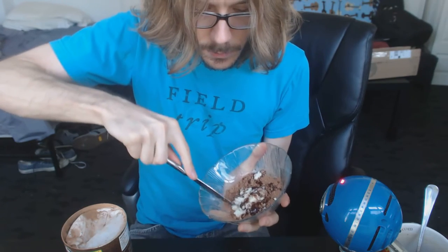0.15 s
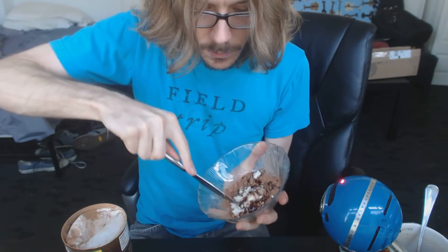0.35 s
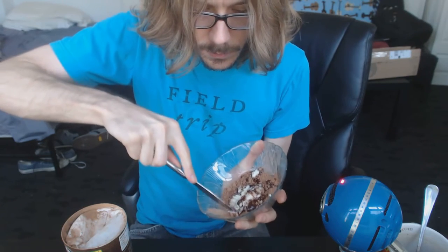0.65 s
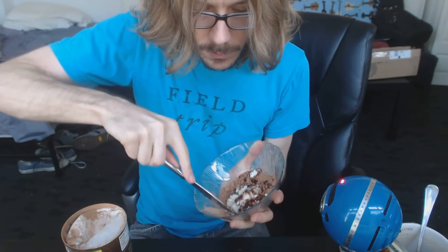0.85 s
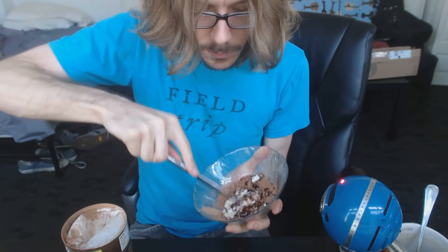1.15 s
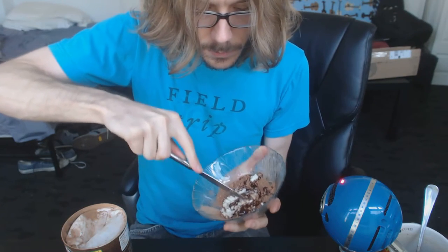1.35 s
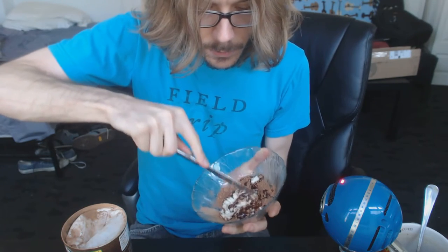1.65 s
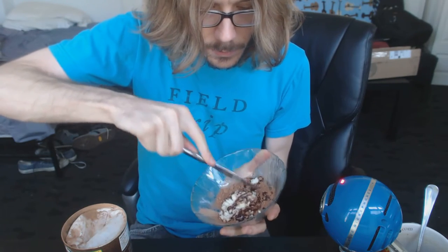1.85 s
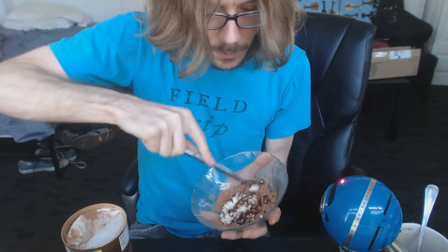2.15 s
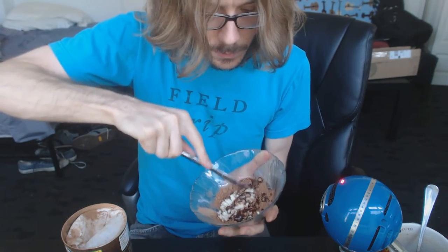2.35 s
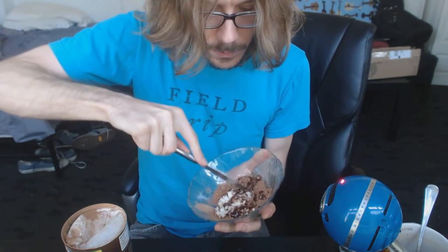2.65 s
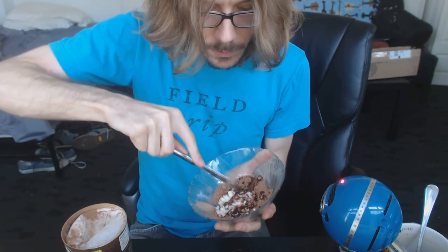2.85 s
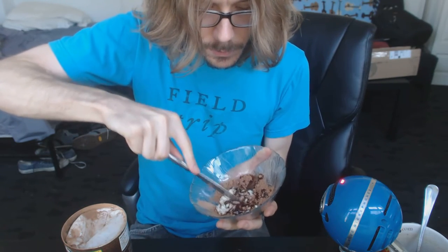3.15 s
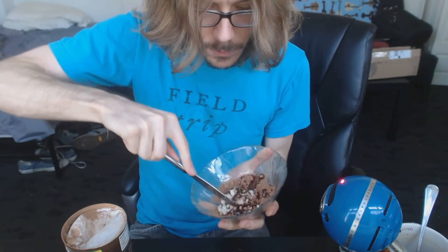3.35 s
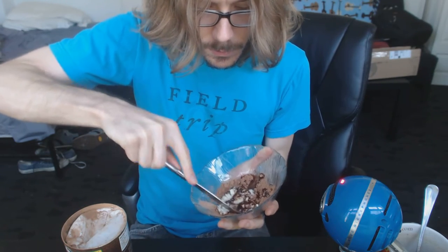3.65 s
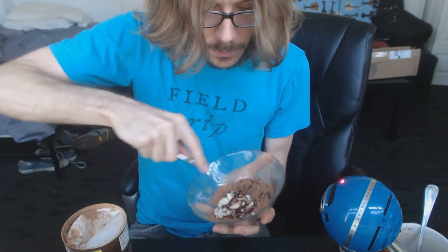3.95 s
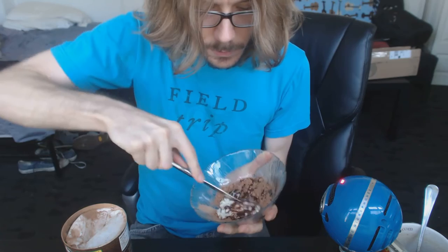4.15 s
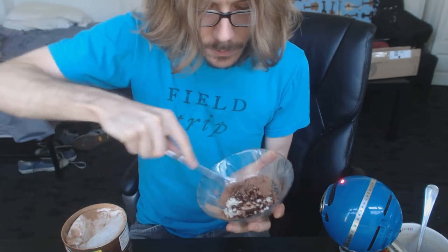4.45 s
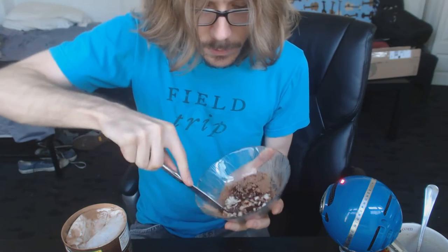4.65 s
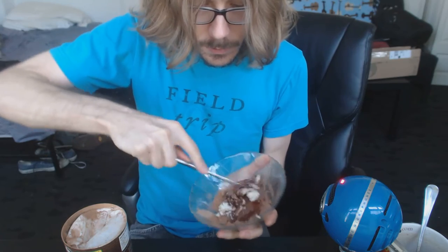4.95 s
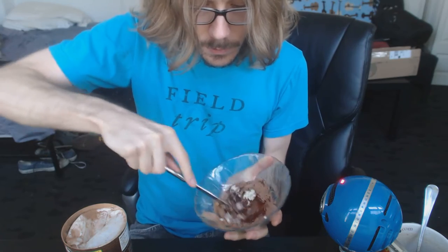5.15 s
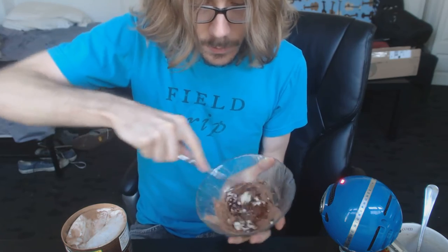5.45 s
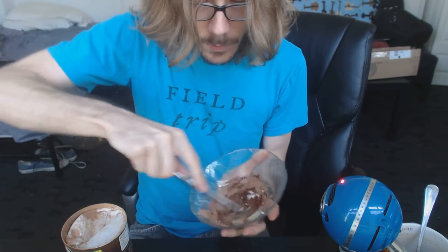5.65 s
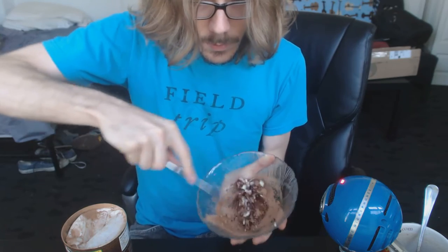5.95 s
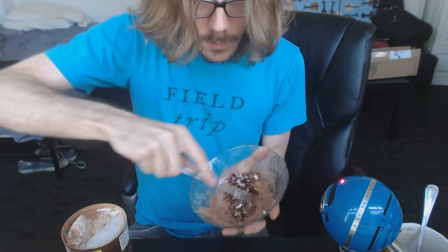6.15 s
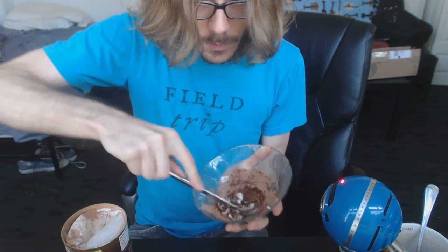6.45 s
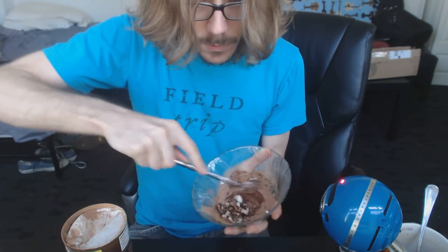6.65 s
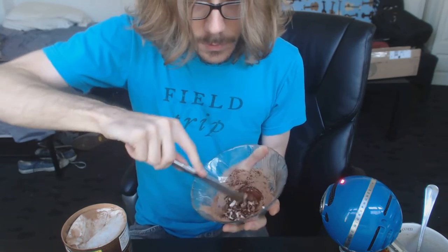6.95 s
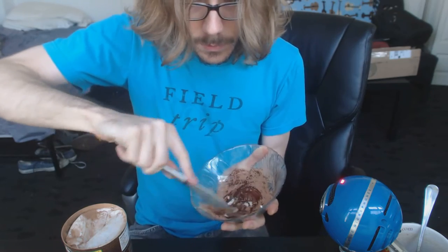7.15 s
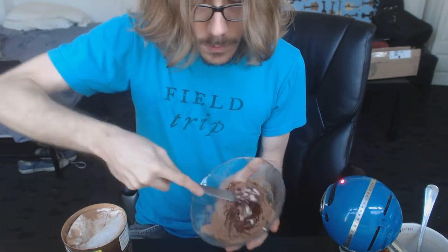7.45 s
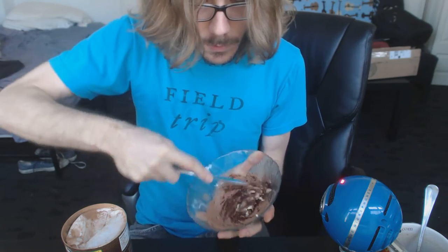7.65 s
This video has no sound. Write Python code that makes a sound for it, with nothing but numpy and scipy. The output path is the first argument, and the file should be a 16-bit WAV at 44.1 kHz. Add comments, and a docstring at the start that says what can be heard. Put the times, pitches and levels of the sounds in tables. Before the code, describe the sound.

Sharp glass-and-metal clacks, loud and dry, open the scene in quick succession, some bright, some dull and thuddy. Midway there is a short gap, then more chopping mixed with tiny clinks and scratchy rubs along the glass. The last seconds are sparser and softer. Close microphone, short room tail, faint hiss, low fan noise sinking slowly throughout.

```python
"""Chopping and stirring in a glass bowl

A steel utensil works a stiff mixture in a hand-held glass bowl, close to a desk microphone.
Knocks excite the damped bowl's resonances and the free rim; ticks and scrapes excite its wall.
Each chop sways the desk as a slow decaying swing; decaying noise tails give a small furnished room.
Behind it lie a fan's shaped-noise rush, its narrow-band hums and a faint microphone hiss."""
import sys
import numpy as np
from scipy import signal
from scipy.fft import rfft, irfft, next_fast_len
from scipy.io import wavfile
from scipy.ndimage import map_coordinates

SR = 44100
rng = np.random.default_rng(int(sys.argv[2]) if len(sys.argv) > 2 else 0)


def int16_out(signal):
    """Quantize to a 16-bit WAV file."""
    q = np.round(np.clip(np.atleast_2d(signal).T, -1, 1) * 32767)
    wavfile.write(sys.argv[1], SR, q.astype(np.int16))


N = 343980


# Shifts of the blade's top band over time: (t/s, gain/dB)
BLADE_TOP_GAIN = [(0, -1), (5.2, 0.5), (5.35, 1.5), (6.1, 4), (6.2, -1), (7.8, 5)]


def blade():
    """Sums knocks, ticks and scrape; the band above about 11.8 kHz rises and dips over time."""
    air = knocks() + ticks() + scrape()
    top = filtered(air, lambda hz: 1 / (1 + (11800 / (hz + 1)) ** 12))
    top_gain = amp(np.interp(np.arange(N) / SR, *np.transpose(BLADE_TOP_GAIN)))
    return air + (top_gain - 1) * top


# Blows of the blade, levels relative: (t/s, level/dB, thud f/Hz, thud level/dB, clack level/dB,
#  brightness level/dB, bounce length/ms, blade ping f/Hz, ping level/dB, rim ring level/dB,
#  rim f woken most/Hz, desk sway level/dB)
BLOWS = [(-0.1, -2, 1100, -9.5, -16, -2, 5, 4886, -14, -33, 2000, -44.5),
         (0.073, 1.5, 1112, -12.5, -15, 1, 4.8, 4810, -12, -32, 2213, -42),
         (0.248, 0.5, 1100, -12, -17, 0, 5, 4800, -15, -32.5, 2000, -41),
         (0.398, 4, 1020, -14.5, -17, 1, 7.3, 4900, -12, -33.5, 2000, -39),
         (0.596, -8.5, 1062, -5.5, -21, 3.5, 5.021, 3140, -18, -21, 890, -43),
         (0.798, -30, 703, 4, -29, -3.5, 4.8, 3190, -13.5, -16, 650, -54),
         (0.932, -22.5, 565, 5.5, -14, -6, 3.6, 3270, -10, -13.5, 1250, -65),
         (1.214, -2, 902, -15, -17.5, -5.5, 2.03, 3090, -24, -28.5, 3200, -46),
         (1.405, -15.5, 1030, -5.5, -14, -3, 2.4, 2930, -31, -27, 2700, -50),
         (1.552, -13.5, 1040, -9.5, -14.5, -3, 3.1, 2870, -28, -27, 2700, -44.5),
         (1.695, -8.5, 1021, -6, -13.5, -9.5, 2.3, 2980, -19.5, -33, 2710, -40),
         (1.849, -12, 1030, -7.5, -17, -0.5, 2.887, 2857, -13, -32, 2400, -39.5),
         (2.017, 5, 978, -16, -17, 3.5, 6.8, 10500, -18.5, -35, 3496, -42),
         (2.213, -14.5, 1135, -9, -17, 0, 7.2, 4840, -8.5, -10.5, 1950, -47),
         (2.306, -29, 1050, -13, -21.5, 4.5, 4, 4788, -8, -18, 1800, -69),
         (2.473, -2.5, 1024, -12, -13, 5, 5, 9600, -22, -34, 2200, -54),
         (3.013, -22.5, 1028, -4, -8, -15, 1.894, 2930, -18, -38.5, 1500, -47.5),
         (3.219, -1, 1040, -11.5, -10, 2.5, 6.43, 3360, -18.5, -28, 3200, -44.5),
         (3.413, -6, 1080, -9.5, -11, 2.5, 5.7, 3370, -21, -23.5, 2700, -45),
         (3.579, -11.5, 1040, -3.5, -9.5, 3.5, 4, 2930, -32, -28.5, 2500, -57),
         (3.786, -10.5, 1080, -7, -17, 5, 5.356, 9880, -13, -28.5, 1001, -53.5),
         (3.881, -18, 1114, -0.5, -13.5, 6.5, 3.8, 3240, -4, -24, 2320, -42),
         (4.053, -14, 1040, -6, -14.5, 8.5, 7.136, 5500, -11, -18.5, 1370, -70),
         (4.275, -23, 1030, 2, -7.5, 3, 3.4, 2940, -24, -36, 2200, -43),
         (4.681, -7, 1027, -7, -18.5, 1.5, 4.2, 3528, -8.5, -38, 1300, -43),
         (4.969, -23.5, 1066, -8, -20, 2.5, 6.5, 9466, -21, -24, 1496, -46),
         (5.173, 0.5, 1260, -24.5, -26.5, -10.5, 2.74, 7537, -18, -21.5, 4300, -55),
         (5.449, -11.5, 1000, -15, -20, 1.5, 5.1, 4390, -20.5, -20.5, 3000, -60),
         (5.8, -26, 1080, -5, -15, 0.5, 8, 6720, -10.5, -11, 1797, -63),
         (5.869, -24.5, 886, -1, -24, -18, 7.2, 2500, -2, -5, 1600, -66.5),
         (5.88, -17.5, 877, -2.5, -18, -8, 4.2, 2697, -25, -2, 2100, -75),
         (6.116, -29, 950, -2, -21.5, -5, 8.4, 3330, -18, -33, 3500, -51),
         (6.331, -9, 1000, -8.5, -18, 6, 10.9, 9740, -4.5, -24.5, 1000, -52.5),
         (6.527, -25, 958, -12.5, -20, 7, 3.776, 3800, -4, -30, 2790, -46.5),
         (6.624, -32.5, 1190, 0, -17.5, -4.5, 9.7, 3280, -16, -11.5, 1510, -51),
         (7.386, -29, 1184, 0, -19.5, 1, 2.905, 3260, -8, -13, 1380, -74.5),
         (7.458, -21.5, 1080, -3.5, -13, 5, 2.579, 9710, -19, -23, 2800, -53.5),
         (7.497, -20.5, 1195, -25, -19.5, 1, 4.5, 4310, -10, -23.5, 4400, -69)]
# Share sent into the room: more for long bounces, deep thuds and weak blows
THROWN_DB, THROWN_DB_PER_MS, THROWN_WITH_THUD, THROWN_SHRINKS = -16.5, 0.38, 0.13, 0.037


def knocks():
    """Each knock is a struck bowl plus a rim ring, both thrown into the room."""
    air, t = np.zeros(N), np.arange(SR // 4) / SR
    for s, db, thud_hz, thud_db, clack_db, bright_db, ms, ping_hz, ping_db, rim_db, rim_hz, _ in BLOWS:
        tilt = knock_colour(thud_db, clack_db, bright_db)
        ping = resonances([(thud_hz, 110, thud_db - 3), (ping_hz, 100, ping_db)])
        body, around = struck_bowl(t, db, ms, tilt, ping)
        ring = amp(db + rim_db) * rim_ring(t, rim_hz)
        thrown_db = THROWN_DB + THROWN_DB_PER_MS * min(ms, 8)
        thrown_db += THROWN_WITH_THUD * thud_db - THROWN_SHRINKS * db
        gain = amp(db - 0.9) / np.abs(body).max()
        knock = room(gain * body + ring, wet_db=thrown_db, spread=gain * around + ring)
        add(air, s + 0.00051, knock)
    return air


# Tone colour of a knock: (f/Hz, level/dB, share of thud dB, share of clack dB, share of brightness dB)
KNOCK_COLOUR = [(600, -19.5, 1.0, 0, 0), (1100, 0, 1.0, 0, 0), (2000, -14, 0.77, 0.16, 0),
                (3200, -1.5, 0, 1.0, 0), (5720, -24, 0, 0.0449, 0.94), (10000, -19.5, 0, 0, 1.5),
                (14000, -26.5, 0, 0, 1.0327)]


def knock_colour(thud_db, clack_db, bright_db):
    """Where the blade lands sets the balance of thud, clack and brightness, as (f/Hz, level/dB)."""
    return [(hz, level + low * thud_db + mid * clack_db + high * bright_db)
            for hz, level, low, mid, high in KNOCK_COLOUR]


# Modes of the held bowl with its mixture, before a small random shift: (f/Hz, width/Hz, level/dB)
BOWL_MODES = [(527, 170, 7.5), (720, 110, -3.5), (1020, 140, 0), (1171, 490, -3.5), (1839.5, 130, -0.5),
              (2058, 230, -1.5), (2962, 230, 1), (3417.7, 270, 1.5), (3880, 310, -6), (4330, 140, -2.5),
              (4810, 400, 4.5), (5465, 730, 0), (6530, 140, 0.5), (6974, 130, -3.5), (7005, 500, -2.5),
              (8340, 75, -7), (9603, 450, 2), (10950, 84, -3.5), (11600, 120, -5), (11822, 200, -4.5),
              (15600, 94, -1), (14200, 250, -2.5), (15300, 200, -5.5)]


def struck_bowl(t, db, ms, tilt, ping):
    """A sharp blow and weaker bounces drive bowl modes, crack and ping: near sound, sound all around."""
    blow = 0.66 * (t == 0)
    bounce_shape = np.exp(-(1000 * t / np.clip(ms, 1, 20)) ** 3)
    bounces = 0.082 * rng.standard_normal(len(t)) * bounce_shape
    modes = [(hz * rng.normal(1, .008), w, level + along(tilt, hz) + rng.normal(0, 2))
             for hz, w, level in BOWL_MODES]

    def contact(f):
        """A weak blow stays longer in contact, which dulls it."""
        return 1 / (1 + 2j * np.pi * f * 1.2e-5 * amp(-.3 * db)) ** 2

    def crack(f):
        """A dry crack in broad, steep-sided bands fills the gaps between modes."""
        return sum(amp(level - 14.0) * resonances([(hz, .8 * hz, 0)])(f) ** 2 for hz, level in tilt)

    def near(f):
        """The bowl as heard directly."""
        return resonances(modes)(f) + crack(f) + ping(f)

    def everywhere(f):
        """What leaves in all directions: narrower modes and less crack."""
        narrow = resonances([(hz, .85 * w, level) for hz, w, level in modes])
        return narrow(f) + amp(-2) * crack(f) + ping(f)

    body = filtered(blow + bounces, lambda f: contact(f) * near(f))
    around = filtered(filtered(blow, everywhere), contact)
    around *= np.linalg.norm(body) / np.linalg.norm(around)
    return body, around


# Partials of the free rim: (f/Hz, level/dB, t60/s)
RIM_PARTIALS = [(699, 4, 0.21), (1574, -3.5, 0.21), (2730, -1, 0.095), (4073, -5, 0.14), (5500, -22.5, .12)]


def rim_ring(t, rim_hz):
    """Decaying sine partials of the rim, 16 dB weaker per octave away from the pitch woken most."""
    ring = np.zeros(len(t))
    for hz, level, t60 in RIM_PARTIALS:
        away_db = 16 * abs(np.log2(hz / rim_hz))
        ring += amp(level - away_db - 60 * t / t60) * np.sin(2 * np.pi * hz * t)
    return ring * (1 - np.exp(-t / 0.0014))  # soft onset


# Small touches of the blade on glass and hard crumbs, levels relative: (t/s, level/dB, f/Hz)
TOUCHES = [(2.748, -56.5, 3250), (3.0594, -52, 3000), (3.6194, -41.5, 3010), (4.0898, -34, 3239),
           (4.2337, -52.5, 5440), (4.2914, -44, 3000), (4.301, -38.5, 5020), (4.33, -46.5, 4900),
           (4.3797, -36, 9730), (4.8592, -49, 9850), (4.878, -43, 4952), (4.948, -54, 12000),
           (5.017, -53, 9500), (5.0414, -53, 3480), (5.0629, -45, 5800), (5.0945, -40.5, 12650),
           (5.1372, -55, 3050), (5.268, -35, 3430), (5.2995, -37.5, 3730), (5.328, -31.5, 3850),
           (5.352, -39.5, 3380), (5.3706, -41, 10000), (5.421, -40, 4970), (5.6258, -31, 6940),
           (5.6376, -40.5, 6790), (5.8122, -36, 6660), (5.921, -40.5, 3770), (6.0463, -48, 5660),
           (6.065, -38, 4480), (6.1474, -47, 3206), (6.1714, -51.5, 3250), (6.4517, -44, 6902),
           (6.4845, -36.5, 11900), (6.5055, -37.5, 3900), (6.7994, -59, 4135), (6.8204, -47.5, 11600),
           (6.8299, -38, 4230), (7.5187, -42, 3914), (7.7494, -66, 4277)]
# Modes of the glass wall, for ticks and scrape: (f/Hz, width/Hz, level/dB)
WALL_MODES = [(3220, 320, -4.5), (3770, 150, 0), (4900, 320, -6.5), (5610, 260, -3), (6740, 264.8, 1),
              (8680, 270, -3), (9724, 250, -2.5), (10620, 320, -5.5), (11900, 200, -3), (12700, 180, -12),
              (14027, 140, -4), (15200, 230, -11)]


def ticks():
    """A touch of a few ms: a blip at its own pitch that also wakes the wall, unevenly."""
    air, t = np.zeros(N), np.arange(SR // 20) / SR
    wall_tilt = [(5000, -5), (9000, -8.5)]  # how much of the wall a tick wakes: (f/Hz, level/dB)
    for s, db, hz in TOUCHES:
        touch = rng.standard_normal(len(t)) * np.exp(-t / 0.0025)
        wall = [(c, w, level + along(wall_tilt, c) + rng.normal(0, 1.8)) for c, w, level in WALL_MODES]
        blip = filtered(touch, resonances([(hz, 450, 0)]))
        tick = filtered(touch, resonances(wall)) + amp(3) * blip
        tick *= amp(db + 1.5) / np.abs(tick).max()
        add(air, s - .0005, room(tick, wet_db=-11.5))
    return air


def scrape():
    """Tiny uneven catches on a smooth rub drive wall modes that come and go as the blade travels."""
    caught = rng.random(N) < 320 / SR  # about 320 catches a second
    catches = caught * rng.standard_normal(N) * amp(7 * rng.exponential(size=N))
    rub = unit(catches) * 2.3 + rng.standard_normal(N)
    wall = np.zeros(N)
    for k, mode in enumerate(WALL_MODES):
        wall += (-1) ** k * amp(1.8 * wobble(14)) * filtered(rub, resonances([mode]))
    level = pressure() * amp(5.1 * wobble(110))  # fast flutter gathers the catches in clumps
    return room(amp(2.5) * level * unit(wall), wet_db=-12)[:N]


# Strokes of the blade along the wall, levels relative: (start t/s, length/s, level/dB)
WALL_STROKES = [(3.882, .03, -56.5), (4.081, 0.018, -41), (4.281, .13, -59), (4.434, 0.034, -65.5),
                (4.855, .03, -65), (4.98, 0.15, -59.5), (5.253, 0.1653, -61), (5.423, 0.025, -47),
                (5.49, .1, -65), (5.613, 0.033, -51), (5.81, 0.053, -60), (5.89, 0.13, -68),
                (6.039, 0.042, -57.5), (6.12, .06, -69), (6.42, 0.14, -55.5), (6.81, .04, -65),
                (7.363, .09, -68), (7.465, 0.078, -56)]
BITE_DB_PER_S, LIFT_DB_PER_S = 1500.5, 902  # how fast a stroke sets in and lets go


def pressure():
    """The blade's rub on the wall: each stroke sets in, holds and lets go."""
    t = np.arange(N) / SR
    total = np.zeros(N)
    for s, length, db in WALL_STROKES:
        bite = BITE_DB_PER_S * (t - s)
        lift = LIFT_DB_PER_S * (s + length - t)
        total += amp(db + np.minimum(0, np.minimum(bite, lift)))
    return total


def sway():
    """Chops rock the desk through arm and chair: decaying 13 Hz swings over a faint steady rumble."""
    desk, t = np.zeros(N), np.arange(SR // 2) / SR
    swing = -np.sin(2 * np.pi * 13 * t) * amp(-60 * t / .5) * (1 - np.exp(-t / 0.037))
    for s, *_, sway_db in BLOWS:
        add(desk, s - .02, amp(sway_db + 14.5) * swing)
    rumble = unit(filtered(rng.standard_normal(N), resonances([(8.8, 6, 0)])))
    return desk + amp(-52.5 + wobble(3.7)) * rumble


# Spectrum of the fan's rush, relative: (f/Hz, level/dB per Hz)
FAN_RUSH = [(20, -0.5), (60, 3), (100, -6.5), (200, -5), (400, -12), (800, -16), (1150, -13), (1600, -21.5),
            (2500, -37), (3300, -36), (5000, -41), (7000, -50), (10000, -62)]
# Narrow hums of the fan: (f/Hz, width/Hz, rms level/dB)
FAN_HUM = [(42, 6.9, -64), (122.6, 7.6, -60.5), (172, 9.9, -65)]
FAN_START_DB, FAN_FADES_DB_PER_S = -49, 0.89


def fan():
    """Shaped noise as a slightly unsteady rush that slowly sinks, with steady narrow-band hums."""
    rush = filtered(rng.standard_normal(N), lambda hz: amp(along(FAN_RUSH, hz)))
    rush_db = FAN_START_DB - FAN_FADES_DB_PER_S * np.arange(N) / SR + 0.67 * wobble(5.2)
    air = amp(rush_db) * unit(rush)
    for hz, width, db in FAN_HUM:
        air += amp(db) * unit(filtered(rng.standard_normal(N), resonances([(hz, width, 0)])))
    return air


# Spectrum of the microphone's own noise, relative: (f/Hz, level/dB per Hz)
MIC_HISS = [(1500, -4.5), (5000, -0.5), (9000, -3.5), (16000, -7)]


def hiss():
    """The microphone's steady, faint noise."""
    return amp(-81) * unit(filtered(rng.standard_normal(N), lambda hz: amp(along(MIC_HISS, hz))))


# Decay of the small furnished room: (f/Hz, t60/s)
ROOM_DECAY = [(300, .45), (1000, 0.35), (3000, 0.38), (6000, 0.34), (10000, 0.28), (16000, 0.18)]


def room(sound, wet_db, spread=None):
    """Adds a noise tail dying band by band; spread, if given, is what leaves in all directions."""
    hz, t, z = signal.stft(rng.standard_normal(SR // 2), SR, nperseg=256)
    decay = amp(-60 * t / along(ROOM_DECAY, hz)[:, None])
    tail = signal.istft(z * decay, SR, nperseg=256)[1]
    tail *= np.clip(np.arange(len(tail)) / SR / .006, 0, 1)  # builds up over 6 ms
    tail *= amp(wet_db) / np.linalg.norm(tail)
    air = signal.fftconvolve(sound if spread is None else spread, tail)
    add(air, 0, sound)
    return air


def resonances(modes):
    """The causal response of (f/Hz, width/Hz, level/dB) modes, neighbours in opposite phase."""
    def response(f):
        return sum((-1) ** k * amp(db) * 1j * f * w / (c * c - f * f + 1j * f * w)
                   for k, (c, w, db) in enumerate(modes))
    return response


def filtered(x, response):
    """x times a complex response of frequency."""
    m = next_fast_len(len(x) + SR // 4)
    return irfft(rfft(x, m) * response(np.fft.rfftfreq(m, 1 / SR)), m)[:len(x)]


def wobble(rate):
    """A smooth random curve, rate knots a second."""
    knots = rng.standard_normal(int(N * rate / SR) + 4)
    return map_coordinates(knots, [np.arange(N) * rate / SR])


def along(points, hz):
    """(f/Hz, value) points read on a log frequency axis."""
    f, v = np.transpose(points)
    return np.interp(np.log(hz + 1), np.log(f + 1), v)


def amp(db):
    """Gain of a level in dB."""
    return 10 ** (np.asarray(db) / 20)


def unit(x):
    """Scaled to rms 1."""
    return x / np.sqrt(np.mean(x ** 2) + 1e-20)


def add(track, s, sound):
    """Mixes a sound in at time s; what lies before time 0 is lost."""
    start = round(s * SR)
    sound = sound[max(0, -start):]
    part = track[max(0, start):][:len(sound)]
    part += sound[:len(part)]


def scene():
    """All sources at the one microphone."""
    return (blade() + sway() + fan() + hiss())[None]


def record(dry):
    """The preamp rounds off high peaks; the treble fades from 15.5 kHz and ends steeply near 16.6 kHz."""
    soft = dry[0] / (1 + np.abs(dry[0] / .95) ** 4) ** (1 / 4)
    fade = [(15500, -2.5), (16200, -16.0)]  # (f/Hz, level/dB), flat outside
    return filtered(soft, lambda hz: amp(along(fade, hz)) / (1 + (hz / 16600) ** 150))[None]


dry = scene()
out = record(dry)
int16_out(out)
```